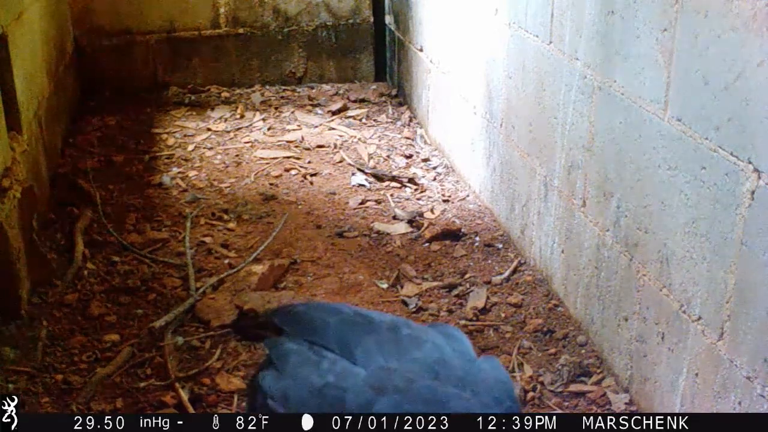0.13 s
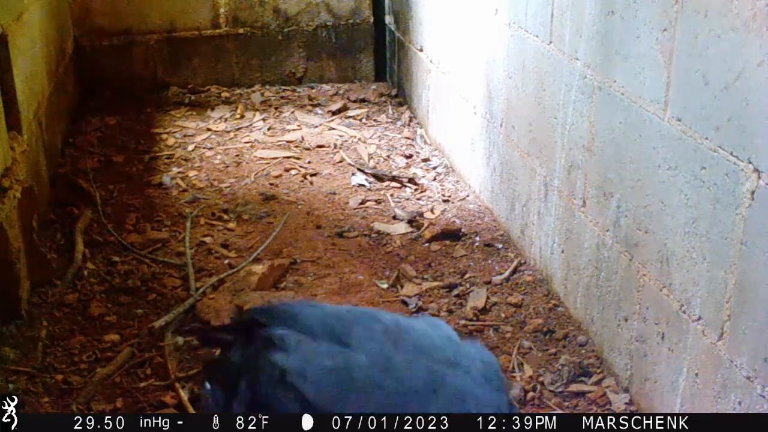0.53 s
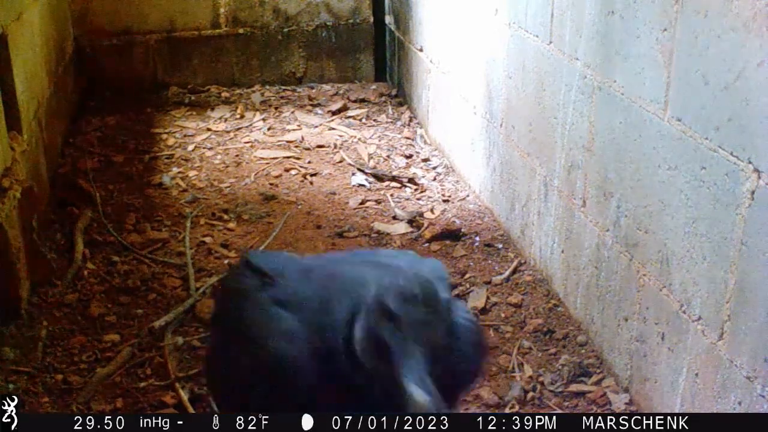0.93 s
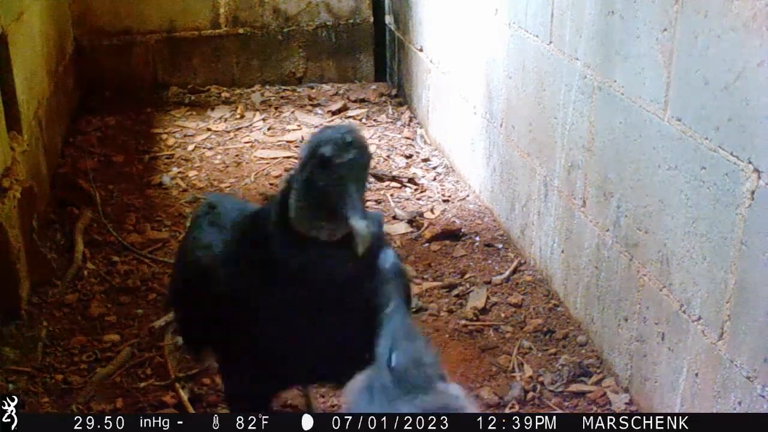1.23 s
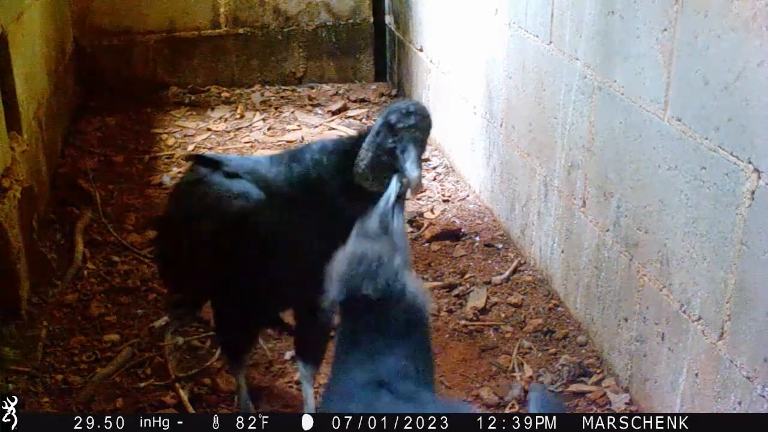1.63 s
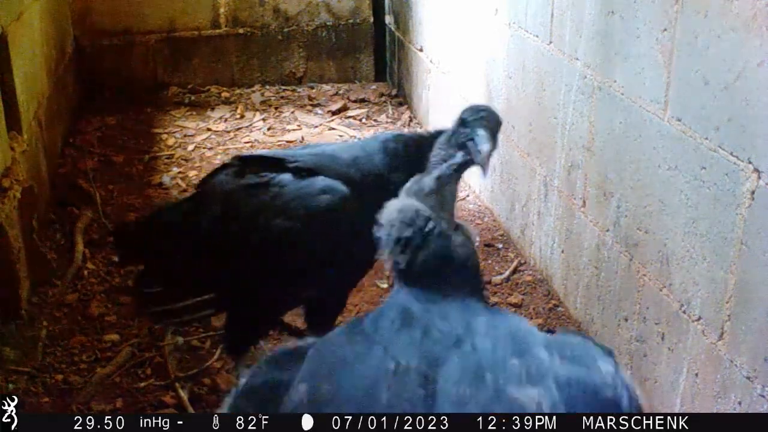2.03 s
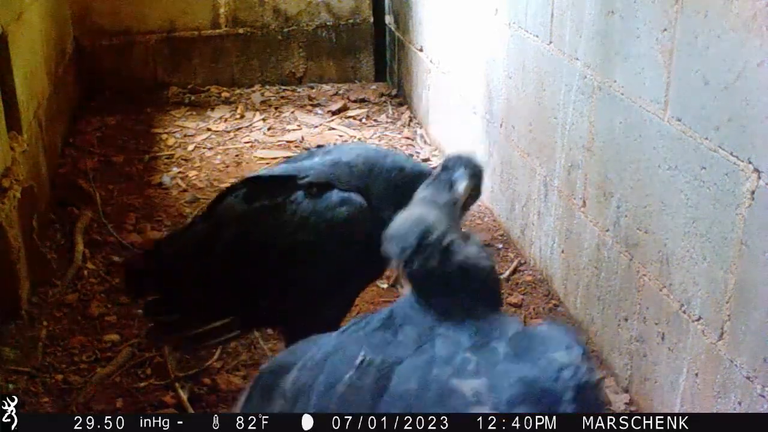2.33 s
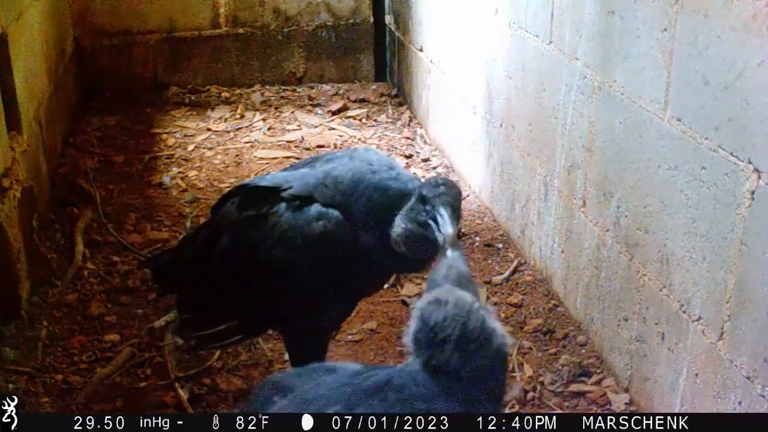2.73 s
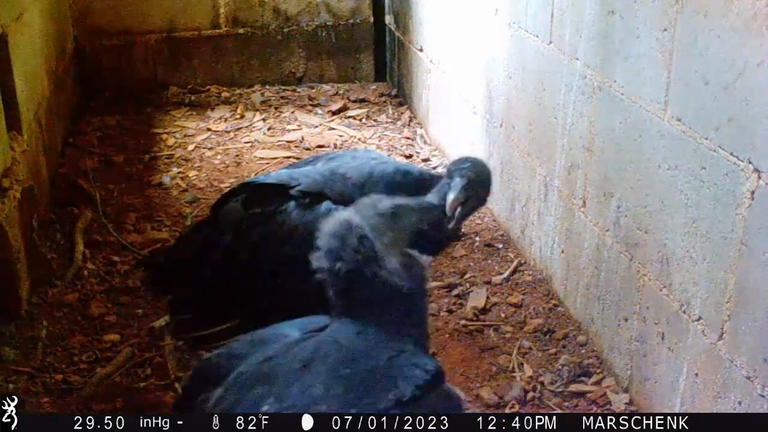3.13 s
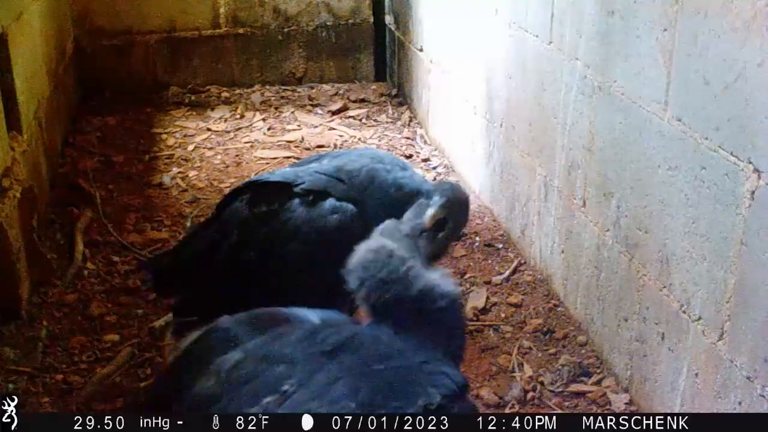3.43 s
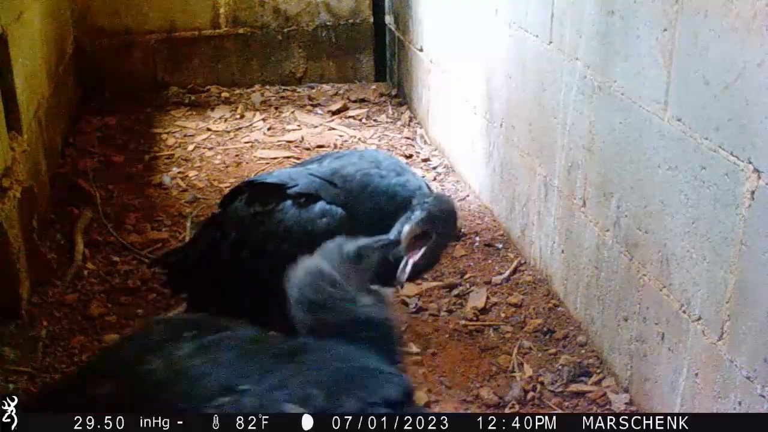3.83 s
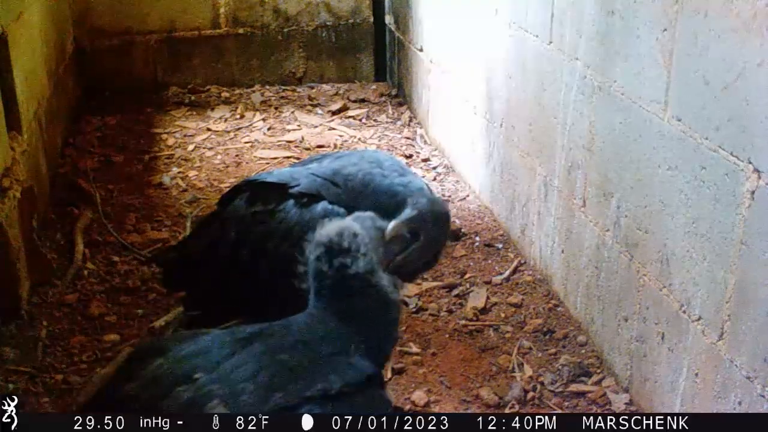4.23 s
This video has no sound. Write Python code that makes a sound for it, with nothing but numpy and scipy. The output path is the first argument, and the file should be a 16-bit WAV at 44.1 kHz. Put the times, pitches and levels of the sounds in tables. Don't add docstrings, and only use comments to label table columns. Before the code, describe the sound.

Close, raspy bird hissing: a sustained breath with a few thuds, then a steady run of short begging hisses with small beak clicks.

```python
import sys
import numpy as np
from scipy import signal
from scipy.fft import rfft, irfft
from scipy.io import wavfile
from scipy.ndimage import uniform_filter1d

SR = 44100
rng = np.random.default_rng(int(sys.argv[2]) if len(sys.argv) > 2 else 0)


def pcm_store(signal):
    levels = np.round(np.clip(np.atleast_2d(signal), -1, 1) * 32767)
    wavfile.write(sys.argv[1], SR, levels.astype(np.int16).T)


def invert_db(x):
    u = np.asarray(x, float) / 20
    return 10 ** u


N = 193819

# (time [s], throat [dB], windpipe over throat [dB], mouth over throat [dB], windpipe ring [Hz])
LONG_BREATH = [
    (.235, -38.5, -15, 4, 420),
    (.294, -24.5, 3, -8.5, 410),
    (.35, -16, -2, -2.5, 432),
    (.42, -14.5, -23.5, 3.5, 435),
    (.635, -14, -8.5, 1, 515),
    (.7, -16, -6.5, -1, 430),
    (.82, -16, -5.5, 2.5, 470),
    (1.389, -22, -0.5, 4.5, 460),
    (1.44, -37.5, 3, -6, 445),
]
# (start [s], rise [s], hold [s], throat top [dB], mouth over throat [dB])
BEGGING_PANTS = [
    (1.566, 0.021, 0.055, -20.5, 1),
    (1.794, 0.074, 0.021, -20, -1.5),
    (2.067, 0.028, 0.079, -18, -1),
    (2.336, 0.058, 0.053, -20, -3),
    (2.604, 0.063, 0.025, -23, -2),
    (2.869, 0.083, 0.0054, -19, -7),
    (3.109, 0.049, 0.066, -18, -5),
    (3.374, 0.049, 0.036, -21.5, -7.5),
    (3.646, 0.071, 0.025, -20.5, -9.5),
    (3.947, 0.09, 0.0076, -22.5, -9.5),
]
# (time [s], throat [dB], mouth over throat [dB])
INDRAWN_AIR = [(0, -49, -12), (.15, -42.5, 1.5), (1.5, -42, 5.5), (1.75, -40, 5), (2.0, -41, 1.5),
               (2.3, -43, 1.5), (2.56, -43.5, 6), (2.8, -43, -6), (3.04, -44, 1), (3.33, -45.5, -8),
               (3.56, -44.5, 3), (3.87, -46.5, -2), (4.1, -48, -1), (4.4, -61, 6.5)]
# (time [s], first ring [Hz], second ring [Hz], both over plain hiss [dB], third ring [dB])
NECK_POSTURES = [(.25, 1590, 2310, -9, 3), (.42, 1523, 2270, 5.5, 7.5), (.55, 1454, 2520, 2.5, 8),
                 (.7, 1660, 2730, -2, -5), (0.819, 1698, 2770, 9.5, -3), (0.971, 1540, 2585, 2, -0.5),
                 (1.16, 1754, 2310, 3, 8), (1.36, 1795, 2304, 3.5, -14), (1.62, 1215, 1970, 7, 0),
                 (1.86, 1204, 2056, 10, 4.5), (2.13, 1220, 2050, 1.5, -1.5), (2.41, 1244, 1740, 11, -1),
                 (2.67, 1240, 1873, 17.5, -1), (2.93, 1225, 2062, 10, 5), (3.19, 1694, 2076, 10, 1),
                 (3.44, 1800, 2067, 14, 10), (3.72, 1220, 2080, 7.5, 5), (4.03, 1500, 2160, 7.5, 5)]
# (time [s], lower ring [Hz], level [dB], upper ring [Hz], level [dB])
BEAK_POSTURES = [(.2, 4100, 12, 5500, -6), (.36, 4200, 8.5, 5030, 1), (.47, 3913, 7.5, 5040, -1),
                 (.56, 4023, 9.5, 4940, 5), (.65, 4480, 7.5, 4910, 7), (.74, 4450, 5, 5350, 6.5),
                 (.85, 4415, 5, 5230, 2.5), (0.969, 3914, 8, 4790, 2), (1.07, 3960, 4.5, 4930, 10),
                 (1.179, 4140, 9.5, 4740, 2.5), (1.33, 4440, 3, 5126, 7.5), (1.62, 4170, 7.5, 5170, 1),
                 (1.86, 4350, 4.6, 5530, -2), (2.13, 3770, 4, 5440, 2), (2.41, 4270, 12, 5000, 0),
                 (2.67, 3940, 5.5, 4837, 12), (2.93, 3900, 8.5, 4900, 10), (3.19, 3745, 8.5, 4930, 10.5),
                 (3.44, 3900, 13, 5260, -7), (3.72, 4150, 12.5, 4620, 6), (4.03, 3840, 8, 4170, 14)]
AIRWAY_WIDTHS = [73.6, 140, 167, 235, 192]
# (time [s], peak [dB], ring [Hz], low part [dB], length [s])
CLACKS = [(0.0993, -32.5, 3030, 7.5, 0.0081), (0.105, -29, 3950, -24, 0.0025),
          (0.164, -31, 4150, -26, 0.0044), (0.222, -37, 4100, -13, 0.0021),
          (0.263, -13, 1820, -2.5, 0.0026), (1.456, -28, 3580, -18, 0.0053),
          (1.5564, -21, 4250, -22, 0.003), (1.763, -21, 1690, -44, 0.0058),
          (2.0238, -21.5, 1940, -15, 0.0059), (2.055, -47, 2100, -8, 0.0026),
          (2.5676, -22, 4300, -7, 0.0028), (2.583, -26, 3220, -18, 0.003), (2.603, -18, 1670, 2, 0.0012),
          (2.847, -28, 1900, -31, 0.0021), (3.08, -37, 1910, 3, 0.0023), (3.364, -32, 2100, -30, 0.003),
          (3.388, -23, 1770, -13, 0.0017), (3.626, -36, 1640, 1, 0.0041), (3.9025, -33, 1600, -23, 0.0041),
          (3.947, -23, 3830, -13, 0.0017), (4.055, -27, 1950, 0, 0.0032), (4.148, -38, 2120, -1, 0.0022)]
# (time [s], level [dB], centre [Hz], length [s])
THUDS = [
    (.1, -48, 131, 0.063),
    (0.114, -34.5, 344, 0.009),
    (0.661, -9, 900, 0.0034),
    (0.671, -2, 564, 0.0057),
    (0.679, -7, 920, 0.0098),
    (0.75, -5, 1290, 0.009),
    (0.752, -14.5, 627, 0.013),
    (0.768, -16, 600, 0.0087),
    (0.775, -7, 710, 0.0067),
]
# (pitch [Hz], time to die by 60 dB [s])
SHED_DECAY = [(200, 0.32), (1000, 0.11), (4000, 0.16), (10000, 0.13)]
# (pitch [Hz], level per Hz [dB])
WASH_COLOUR = [(30, -28), (150, -5.5), (400, 2), (1000, 4.5), (2000, -1), (4600, -7), (5500, -19.5),
               (6900, -27.5), (8000, -20.5), (10300, -27), (11900, -43)]
# (pitch [Hz], gain [dB])
MIC_HOLE = [(100, -14), (200, -1), (350, 0.5), (1500, 0.5), (5000, 3), (5500, -5), (6100, -15), (7000, -28),
            (7800, -14.5), (10300, -16), (11300, -25), (11900, -35)]
# (pitch [Hz], gain [dB])
TREBLE_LIFT = [(300, -18.5), (1500, -6), (4000, 2.5), (9000, 2)]
# (pitch [Hz], gain [dB])
HASH_COLOUR = [(8, -48), (22, 3.5), (200, 3.5), (600, 5.5), (3000, -8), (5500, -9), (7000, -11.5),
               (10300, -9), (11300, -16.5), (11900, -35)]

LEAD_S, LEAD_DB, START_DB, RISE_CURVE = .03, -32.5, -12.5, 0.99
FALL_S, FALL_DB, TAIL_S, TAIL_DB = 0.041, -18, 0.086, -38.5
PIPE_TOP_DB, PIPE_RISE_FOLLOW, PIPE_FALL_FOLLOW = -22, 0.88, 0.81
PIPE_START_HZ, PIPE_TOP_HZ, PIPE_END_HZ = 397, 464, 445
MOUTH_RISE_FOLLOW, MOUTH_FALL_FOLLOW = 0.62, 0.98
BEAK_OPENS_S, BEAK_SHUT_DB = 0.018, -13
AIR_DB = -12.5
QUIET_AIR_DB, QUIET_PIPE_DB = -2, -16.5
GUST_DB, GUST_S, RING_FLICKER_DB = .9, .03, 2.0
SECOND_RING_DB, THIRD_RING_HZ = -2.5, 3205
WASH_DB = -42.5


def evened(x):
    return x / np.sqrt(np.mean(x ** 2) + 1e-20)


def read(points, hz):
    f, value = np.transpose(points)
    return np.interp(np.log(hz + 1), np.log(f + 1), value)


def colour(x, points):
    gain = invert_db(read(points, np.fft.rfftfreq(len(x), 1 / SR)))
    return irfft(rfft(x) * gain, len(x))


def band(x, lo_hz, hi_hz, order=2):
    sos = signal.butter(order, [lo_hz, hi_hz], "band", fs=SR, output="sos")
    return signal.sosfilt(sos, x)


def resonate(x, hz, width):
    turn = np.exp(2j * np.pi * np.cumsum(hz * np.ones(len(x))) / SR)
    r = np.exp(-np.pi * width / SR)
    smooth = signal.lfilter([1 - r], [1, -r], x / turn)
    return 2 * (turn * smooth).real


def drift(seconds):
    size = int(seconds * SR)
    return evened(uniform_filter1d(uniform_filter1d(rng.standard_normal(N), size), size))


def hiss():
    t = np.arange(N) / SR
    (throat_gain, pipe_gain, mouth_gain, air_gain), pipe_hz = airflow(t)
    gusts = invert_db(2.0 * drift(0.0018) + GUST_DB * drift(GUST_S))
    air, eddies = rng.standard_normal((2, N)) * gusts

    pipe_ring = resonate(resonate(air, pipe_hz, 333), pipe_hz, 120)
    pipe = evened(pipe_ring) + 0.062 * evened(band(air, 159, 303))

    effort = np.clip((20 * np.log10(throat_gain + 1e-9) + 50) / 22, .5, 1)
    airway = 1.43 * eddies
    for (hz, db), width in zip(rings(t), AIRWAY_WIDTHS):
        hz = hz * (1 + 0.0072 * drift(0.022))
        strength = effort * invert_db(db + 3 + RING_FLICKER_DB * drift(0.031))
        airway = airway + strength * resonate(resonate(air, hz, 3 * width), hz, width)
    airway = band(airway, 680, 9800)

    throat = colour(airway, [(2400, 0), (3300, -30)])
    sound = throat_gain * evened(throat) + mouth_gain * evened(airway - throat)
    return sound + pipe_gain * pipe + air_gain * evened(band(air, 9200, 13700))


def airflow(t):
    s, *columns = np.transpose(LONG_BREATH)
    db, pipe_db, mouth_db, hz = (np.interp(t, s, c) for c in columns)
    outside_s = np.maximum(np.maximum(s[0] - t, t - s[-1]), 0)
    db = db - 300 * outside_s
    long_gains = invert_db([db, db + pipe_db, db + mouth_db, db + mouth_db + AIR_DB])
    parts = [(long_gains, hz)] + [pant(t, *row) for row in BEGGING_PANTS]

    s, db, mouth_db = np.transpose(INDRAWN_AIR)
    db = np.interp(t, s, db, left=-90, right=-90)
    mouth_db = np.interp(t, s, mouth_db)
    quiet = invert_db([db, db + QUIET_PIPE_DB, db + mouth_db, db + mouth_db + QUIET_AIR_DB])

    gains = np.sqrt(sum(g ** 2 for g, _ in parts) + quiet ** 2)
    pipe_power = sum(g[1] ** 2 for g, _ in parts)
    return gains, sum(g[1] ** 2 * hz for g, hz in parts) / pipe_power


def pant(t, start, rise, hold, top_db, mouth_db):
    top, end = start + rise, start + rise + hold
    s = [start - 1, start - LEAD_S, start, top, end, end + FALL_S, end + FALL_S + TAIL_S, end + 1]
    flow_db = np.interp(t, s, [-900, LEAD_DB, START_DB, 0, 0, FALL_DB, TAIL_DB, -300])
    climb_db = START_DB * np.clip((top - t) / rise, 0, 1) ** RISE_CURVE
    flow_db = np.where((t > start) & (t < top), climb_db, flow_db)

    pipe_db = PIPE_TOP_DB + np.where(t < end, PIPE_RISE_FOLLOW, PIPE_FALL_FOLLOW) * flow_db
    mouth_db = top_db + mouth_db + np.where(t < end, MOUTH_RISE_FOLLOW, MOUTH_FALL_FOLLOW) * flow_db
    mouth_db = mouth_db + np.interp(t, [start, start + BEAK_OPENS_S], [BEAK_SHUT_DB, 0])
    hz = np.interp(t, [start, end, end + FALL_S], [PIPE_START_HZ, PIPE_TOP_HZ, PIPE_END_HZ])
    return invert_db([top_db + flow_db, pipe_db, mouth_db, mouth_db + AIR_DB]), hz


def rings(t):
    s, *neck = np.transpose(NECK_POSTURES)
    first, second, neck_db, third_db = (held(t, s, c) for c in neck)
    s, *beak = np.transpose(BEAK_POSTURES)
    lower, lower_db, upper, upper_db = (held(t, s, c) for c in beak)
    return [(first, neck_db), (second, neck_db + SECOND_RING_DB), (THIRD_RING_HZ, third_db),
            (lower, lower_db), (upper, upper_db)]


def held(t, s, value, ease_s=.07):
    nearest = np.searchsorted((s[1:] + s[:-1]) / 2, t)
    return uniform_filter1d(value[nearest], int(ease_s * SR))


def ticks():
    size = 2000
    out, t = np.zeros(N + size), np.arange(size) / SR
    cracks = rng.standard_normal((len(CLACKS), size))
    for (s, db, hz, low_db, length), crack in zip(CLACKS, cracks):
        shape = (1 - np.exp(-t / 0.00024)) * np.exp(-(t / max(length, .0005)) ** 2.2)
        tone = 1.16 * evened(resonate(crack, hz, 530))
        tone = tone + evened(band(crack, 1940, 5500)) + evened(band(crack, 4200, 10200))
        tone = tone + invert_db(low_db) * evened(band(crack, 170, 2100))
        out[round(s * SR):][:size] += invert_db(db - 2.5) * shape * tone
    return out[:N]


def flaps():
    size = 5000
    out, t = np.zeros(N + size), np.arange(size) / SR
    noises = rng.standard_normal((len(THUDS), 2, size))
    for (s, db, hz, length), (puff, lumps) in zip(THUDS, noises):
        lumpy = puff * invert_db(3 * evened(uniform_filter1d(lumps, 120)))
        shape = (1 - np.exp(-t / 0.00052)) * np.exp(-t / length)
        out[round(s * SR):][:size] += invert_db(db) * shape * evened(band(lumpy, hz / 2, hz * 2))
    return out[:N]


def shed(x):
    taps = np.zeros(SR // 2)
    at = np.arange(200, len(taps) - 20, 20)
    taps[at + rng.integers(0, 20, len(at))] = rng.choice([-1., 1.], len(at))
    hz, t, z = signal.stft(taps, SR, nperseg=256)
    decay = invert_db(-60 * t / read(SHED_DECAY, hz)[:, None])
    tail = signal.istft(z * decay, SR, nperseg=256)[1]
    return signal.fftconvolve(x, tail / np.linalg.norm(tail))[:N]


def outdoor_wash():
    rustle = invert_db(1.9 * drift(0.0094) + .6 * drift(0.041))
    return invert_db(WASH_DB) * evened(colour(rng.standard_normal(N) * rustle, WASH_COLOUR))


def scene():
    breath, clacks, thuds = hiss(), ticks(), flaps()
    echoes = shed(invert_db(-12) * breath + invert_db(-5.0) * clacks + invert_db(-9) * thuds)
    near = colour(breath + clacks + echoes, MIC_HOLE)
    return np.tile(near + thuds + outdoor_wash(), (2, 1))


def roll_off(x):
    return signal.sosfilt(signal.butter(12, 12270, fs=SR, output="sos"), x)


def record(dry):
    hot = colour(dry[0], TREBLE_LIFT)
    cut_off = np.clip(hot, -invert_db(-18.0), invert_db(-15.5)) - hot
    mono = dry[0] + invert_db(5.5) * colour(cut_off, HASH_COLOUR)
    lag = np.exp(-1j * 9 * np.sqrt(np.fft.rfftfreq(N, 1 / SR) / 1000))
    mono = irfft(rfft(np.roll(mono, -SR // 2000)) * lag, N)
    top_limit = signal.firwin(511, 12050, window=("kaiser", 9), fs=SR)
    mono = signal.oaconvolve(mono, top_limit, "same")
    return roll_off(np.tile(mono, (2, 1)))


dry = scene()
out = record(dry)
pcm_store(out)
```